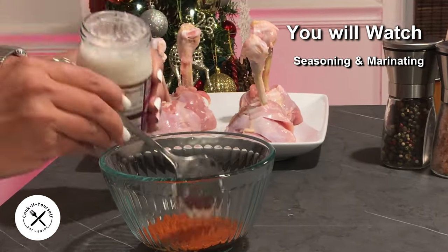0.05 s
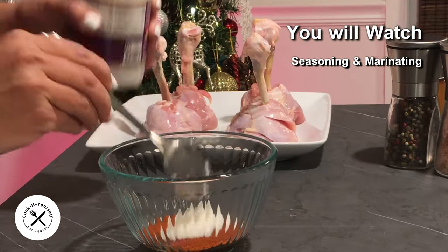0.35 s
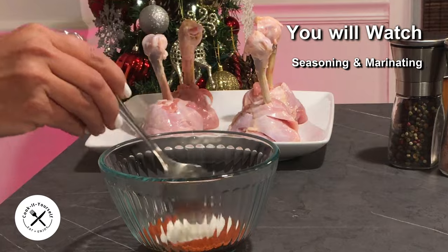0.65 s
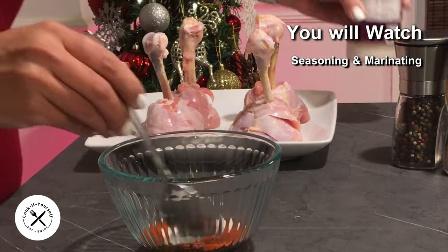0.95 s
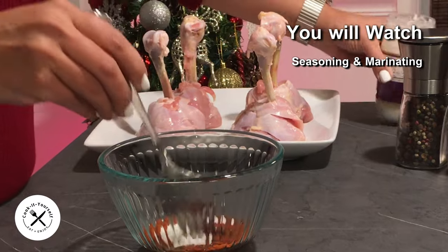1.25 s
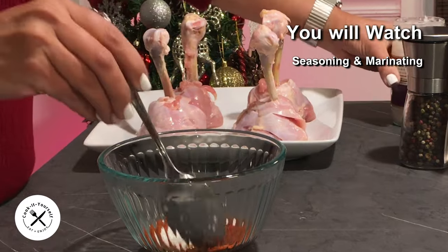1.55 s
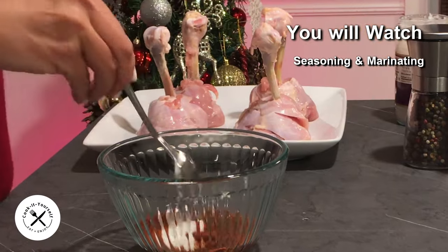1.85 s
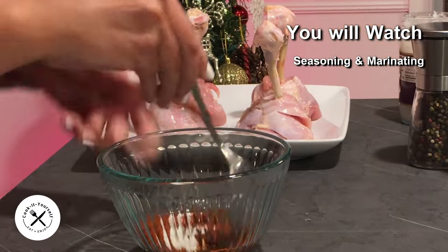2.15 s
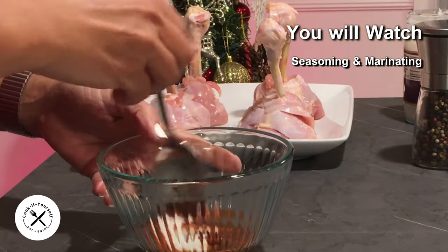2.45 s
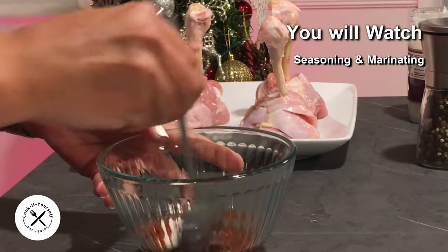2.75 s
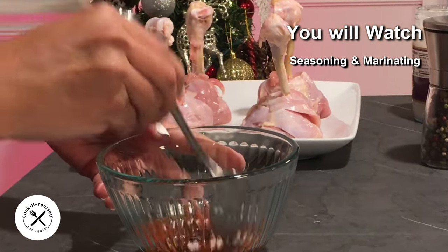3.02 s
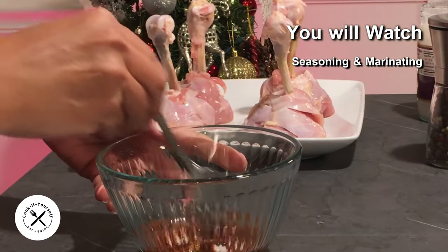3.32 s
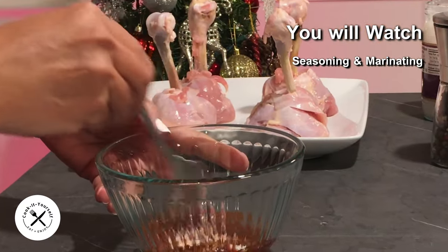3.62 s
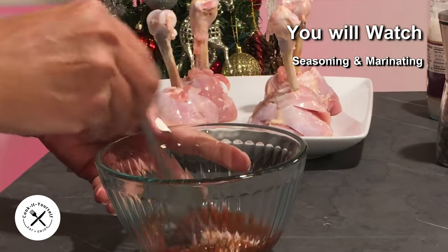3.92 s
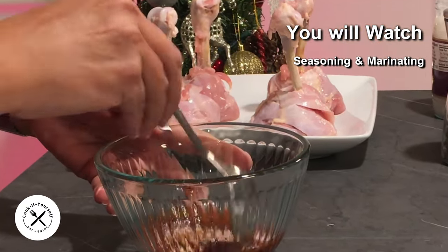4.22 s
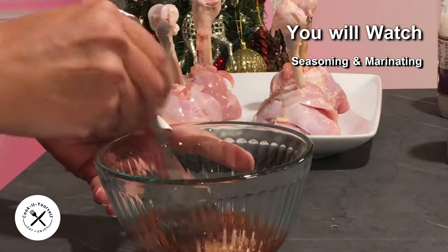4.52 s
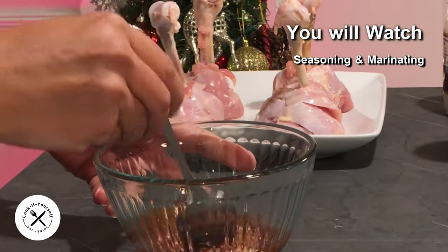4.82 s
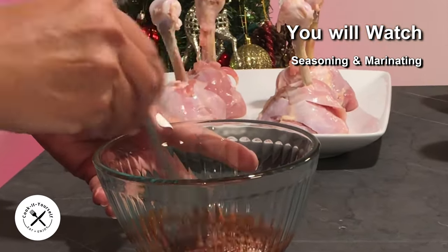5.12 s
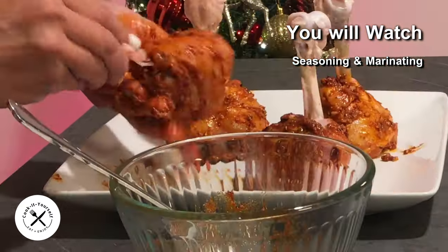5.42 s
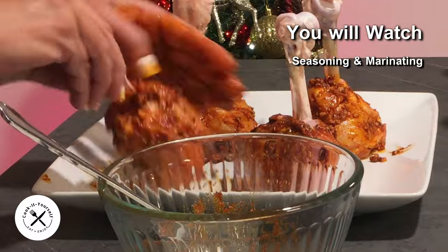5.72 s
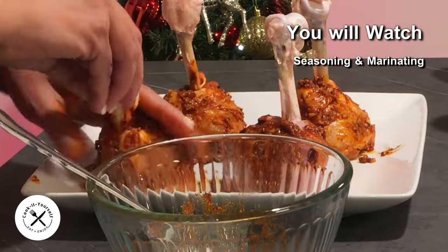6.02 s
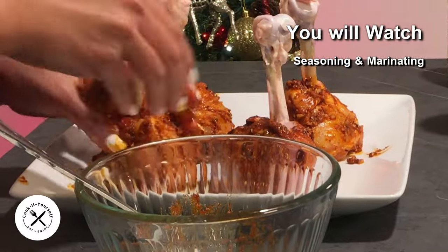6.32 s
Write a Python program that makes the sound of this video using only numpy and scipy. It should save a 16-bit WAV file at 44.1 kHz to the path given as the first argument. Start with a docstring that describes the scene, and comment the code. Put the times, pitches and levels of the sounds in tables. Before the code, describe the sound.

A metal spoon swishes faintly through dry spices in a glass bowl, and a jar is set down with a quick cluster of dull knocks. The stirring turns into irregular clinks, the bowl thudding softly on the kitchen counter. Near the end come tiny sticky smacks of fingers rubbing marinade onto chicken. An appliance hums low throughout, and the stereo sound is wide.

```python
"""Clinks, knocks and soft swishes: a metal spoon stirs dry spices in a glass bowl on a kitchen counter.
The spoon drags through powder, strikes the glass and rocks the bowl against the counter. A jar is set
down behind it. Towards the end, sticky films snap as fingers rub wet marinade onto chicken.
An appliance hums low throughout. A closely spaced microphone pair spreads the low mids very wide."""
import sys
import numpy as np
from scipy import signal
from scipy.fft import rfft, irfft, next_fast_len
from scipy.io import wavfile
from scipy.ndimage import uniform_filter1d

SR = 44100
rng = np.random.default_rng(int(sys.argv[2]) if len(sys.argv) > 2 else 0)


def master(y):
    """Save y as 16-bit WAV."""
    cut = np.clip(np.atleast_2d(y).T, -1, 1)
    pcm = np.round(cut * 32767)  # scale
    wavfile.write(sys.argv[1], SR, pcm.astype(np.int16))


N = 285327
TIME_S = np.arange(N) / SR
AGE_S = np.arange(int(.7 * SR)) / SR   # time within one event

# Spoon strikes. Each row: start in seconds, knock level in dB, knock treble in dB per octave,
# clink level in dB, clink treble in dB per octave, glass ring level in dB.
STRIKES = [(1.133, -45, 3.5, -62, 2.5, -90), (2.020, -41, -3.5, -60, 3.5, -81),
           (2.563, -33.5, 3.5, -68.5, -11, -94), (2.673, -45, 10.5, -44.5, 6.5, -40.5),
           (3.361, -41.5, -14, -92, -3, -96), (3.508, -44.5, -5.5, -74.5, -5, -85),
           (3.613, -43, -7, -78, 8, -100), (3.825, -36, -3, -78, -6, -83),
           (4.197, -41, 5, -53.5, -9, -66.5), (4.477, -37, -4.5, -57.5, 10, -82),
           (4.623, -30.5, -6.5, -75, -4, -95), (4.785, -33, 3, -41.5, -4.5, -61.5),
           (4.943, -32.5, -3, -55.5, -2.5, -91), (5.07, -34, 1, -63, 13, -94)]
# Spoon strokes. Each row: centre in seconds, half length in seconds, level in dB, treble in dB per octave.
SWISHES = [(0.249, 0.029, -59, -5.5), (0.332, .03, -64, -5.5), (0.806, .11, -63.5, -1),
           (0.961, 0.039, -62, -2), (1.622, 0.054, -71.5, -2), (1.885, 0.4, -72, -2.5),
           (2.192, 0.11, -66.5, -7), (4.017, 0.026, -65, 3.5)]
# Clearest smacks. Each row: start in seconds, level in dB, pitch in Hz.
SMACKS = [(3.791, -71, 8400), (4.670, -74.5, 7670), (5.572, -70, 12200), (5.909, -67, 8900),
          (6.128, -65.5, 14800)]
# Spells of random smacks. Each row: start and end in seconds, smacks per second, level in dB.
STICKY_SPELLS = [(2.89, 5.3, 2.7, -71), (5.402, 5.65, 18.7, -68), (5.898, 6.35, 14, -71.5)]
# Jar contacts. Each row: start in seconds, level in dB, treble and bass in dB per octave.
JAR_HITS = [(1.233, -33, 2, -6), (1.263, -30, -1, 4.5), (1.365, -30, 0.5, 1.5), (1.392, -35, -0.5, 13.5)]

# Modes. Each row: frequency in Hz, relative level in dB, T60 in seconds.
SPOON_MODES = [(1234, -27, 0.2), (1980, -35, 0.13), (2270, -17, 0.27), (2466, -33, .27), (3115, 2.5, 0.11),
               (3460, -7.5, 0.37), (3740, -25, 0.65), (4310, 1, 0.36), (4714, -3.5, .22), (5700, 1, 0.25),
               (6330, 2, 0.34), (6900, -9, 0.21), (7700, -15.5, .16), (8260, 9.5, .17), (9200, 2, 0.16),
               (11200, 13.5, 0.23), (11800, -5.5, 0.1), (12860, -9, .11), (14800, 19.5, 0.069),
               (13400, 13, 0.09), (16300, -10, 0.085)]   # damped by the fingers
GLASS_MODES = [(1081, -7, 0.33), (2630, -0.5, 0.29), (3960, -19.5, 0.36), (4592, -12.5, 0.3),
               (5960, -34, .2), (7200, -10.5, 0.25), (7380, -4, 0.19), (8000, -13, 0.164), (8980, -3, 0.2),
               (10910, 7.5, 0.1), (11160, 2, 0.049), (12050, -5.5, 0.11), (14270, 3, 0.13),
               (13100, -18, .17)]   # ringing freely
KNOCK_MODES = [(138.3, -6, 0.28), (219.1, -12, 0.53), (246.5, -6, 0.38), (287.8, -3.5, 0.21),
               (361.2, -0.5, 0.2), (467.5, -11, 0.27), (617, -17, 0.23), (674, -19.5, 0.37),
               (736, -22, 0.099), (933, -27.5, 0.3), (991, -25.5, 0.3), (1043, -17.5, 0.14),
               (1337, -40.5, 0.39), (2500, -49.5, 0.73), (3070, -44, 0.21)]   # bowl on counter
JAR_MODES = [(145.8, 6.5, 0.15), (232.3, -7, 0.4), (265, -13, 0.79), (317.3, 1.5, 0.16), (459.6, 0, 0.12),
             (620, -7, 0.2), (682, -6.5, 0.24), (1010, -26.5, 0.12), (1080, -26.5, 0.38),
             (2200, -38.5, 0.34), (2730, -52, 0.57), (2870, -41.5, 0.22)]   # jar on counter
# Spectra of the dense resonances between modes. Each row: frequency in Hz, relative density in dB.
CLINK_SPECTRUM = [(400, -5.5), (1200, 2.5), (1650, -3), (2400, -6.5), (4400, -5), (5200, -9), (6300, 0.5),
                  (9200, -0.5), (10200, 2.5), (11400, 8.5), (13000, 10.5), (15500, 8.5)]
KNOCK_SPECTRUM = [(60, -2.5), (130, 2), (190, -14), (280, 0), (380, -0.5), (520, -9), (820, -20.5),
                  (1050, -20), (1500, -39.5), (3000, -51), (5000, -56), (16000, -81)]
JAR_SPECTRUM = [(60, -11.5), (140, 3.5), (200, -5.5), (450, -9), (690, -18), (820, -20.5), (1100, -26.5),
                (1600, -39.5), (3100, -43.5), (4200, -63), (16000, -75.5)]
# Noise spectra. Each row: frequency in Hz, relative density in dB.
POWDER_SPECTRUM = [(300, 14.5), (1000, -2.5), (1600, -2.5), (2800, -0.5), (5000, -3), (8000, -1),
                   (12000, 7), (16000, 7)]
RUMBLE_SPECTRUM = [(10, -31.5), (25, -4), (40, 1.5), (58, 4.5), (78, 2), (115, -16.5), (165, -7.5),
                   (190, -13.5), (250, -9), (305, -19), (345, -16), (500, -31.5), (1000, -43), (1500, -52),
                   (2200, -62), (5000, -72.5)]
HISS_SPECTRUM = [(1500, -13.5), (4800, -16.5), (6000, -13.5), (8000, -14), (8800, -9.5), (10300, -12),
                 (11000, -7.5), (13500, -5), (15800, -3)]
# Kitchen echo. Each row: frequency in Hz, T60 in seconds.
ROOM_DECAY = [(150, 0.42), (1000, 0.4), (4000, 0.31), (15000, 0.15)]
# Stereo width of the microphone pair. Each row: frequency in Hz, side gain in dB.
SIDE_GAIN = [(60, -15), (105, -0.5), (140, -25.5), (205, 22), (280, 5.5), (460, 10), (1000, 7.5),
             (2200, 3.5), (4400, -1.5), (8000, -5), (15000, -8.5)]


def spoon():
    """Steel strikes glass with a slightly soft attack, cracks and rebounds; the glass rings on."""
    pivot_hz, bass_db_oct = 7000, 2.5
    rebound_s, rebound_loss_db = .0047, 11
    clinks = [(s, db, treble, bass_db_oct, ring_db) for s, _, _, db, treble, ring_db in STRIKES]
    rebounds = [(s + rebound_s, db - rebound_loss_db, treble, bass) for s, db, treble, bass, _ in clinks]
    spectrum = clustered(CLINK_SPECTRUM, SPOON_MODES, valley_db=-11, rel_width=.028)
    out = blows(clinks + rebounds, SPOON_MODES, spectrum, pivot_hz, modes_db=-11.5, rise_s=.0026,
                clatter_t60_s=.044, room_db=-4.5, scatter_db=7.5, detune=.009, crack_db=-9)
    for start_s, _, treble_db_oct, _, ring_db in clinks:
        glass = ringing(tilted(GLASS_MODES, pivot_hz, treble_db_oct, bass_db_oct), scatter_db=1)
        glass = reflected(glass, wet_db=-12, t60_s=.25)
        add(out, start_s, from_db(ring_db) * glass * rise(.0035))
    return out


def bowl():
    """The bowl tips just after each strike and thuds on the counter; gentle pushes sound boomier."""
    lag_s, firm_db, bass_per_db = .002, -27.5, .3
    knocks = [(s + lag_s, db, treble, bass_per_db * (firm_db - db)) for s, db, treble, *_ in STRIKES]
    spectrum = clustered(KNOCK_SPECTRUM, KNOCK_MODES, valley_db=-5.5, rel_width=.021)
    return blows(knocks, KNOCK_MODES, spectrum, pivot_hz=356, modes_db=-.5, rise_s=.00488,
                 clatter_t60_s=.21, room_db=-1.5, scatter_db=.5, detune=.0075, crack_db=.5)


def powder(grain_db=1):
    """Grains slip under the spoon: a fine, uneven hiss that swells with each stroke."""
    out = np.zeros((2, N))
    for centre_s, half_s, level_db, treble_db_oct in SWISHES:
        slips = uniform_filter1d(rng.standard_normal(len(AGE_S)), size=130)
        grains = from_db(grain_db * slips / slips.std())
        lead_s = min(3 * half_s, centre_s, AGE_S[-1] / 2)
        stroke = np.exp(-((AGE_S - lead_s) / half_s) ** 2)
        hiss = noise(tilted(POWDER_SPECTRUM, 1200, treble_db_oct))
        add(out, centre_s - lead_s, from_db(level_db) * stroke * grains * hiss)
    return out


def grazes():
    """The circling spoon's edge ticks on the glass, so lightly that only high modes ring."""
    out = np.zeros((2, N))
    high_modes = tilted(GLASS_MODES, pivot_hz=11500, treble_db_oct=0, bass_db_oct=-28)
    for start_s, level_db, _ in contacts(from_s=1.78, to_s=2.17, per_s=11, level_db=-72.5):
        tick = ringing(high_modes, scatter_db=9, detune=.017) * rise(.003)
        add(out, start_s, from_db(level_db) * tick)
    return out


def marinade(centre_hz=12100, spread_oct=.27):
    """Tiny sticky films snap, each around its own pitch."""
    out = np.zeros((2, N))
    random_smacks = [(s, db, centre_hz * 2 ** (spread_oct * chance))
                     for spell in STICKY_SPELLS for s, db, chance in contacts(*spell)]
    for start_s, level_db, hz in SMACKS + random_smacks:
        spectrum = [(hz * .56, -24), (hz * .99, -3), (hz, 0), (hz * 2.1, -10)]
        snap = clatter(spectrum, t60_s=.13, room_db=-5.5) * rise(.0022)
        add(out, start_s, from_db(level_db) * unit_attack(snap))
    return out


def jar():
    """A spice jar lands on one edge, then flat."""
    return blows(JAR_HITS, JAR_MODES, JAR_SPECTRUM, pivot_hz=382, modes_db=0, rise_s=.0059,
                 clatter_t60_s=.026, room_db=-16.5, scatter_db=1.5, detune=.0074, crack_db=-21)


def room_tone(hum_hz=59.18, waver=.16, hum_db=-42, rumble_db=-44.5, hiss_db=-71):
    """An appliance hums and wavers over soft rumble and thin hiss."""
    sway = noise([(1, -18), (7, 8.5), (14, -9), (40, -91.5)], N)
    phasor = (1 + waver * (sway[0] + 1j * sway[1])) * np.exp(2j * np.pi * hum_hz * TIME_S)
    hum = np.sqrt(2) * np.real(phasor * [[1], [1j]])   # side a quarter cycle ahead
    rumble, hiss = noise(RUMBLE_SPECTRUM, N), noise(HISS_SPECTRUM, N)
    return from_db(hum_db) * hum + from_db(rumble_db) * rumble + from_db(hiss_db) * hiss


def blows(hits, modes, spectrum, pivot_hz, modes_db, rise_s,
          clatter_t60_s, room_db, scatter_db, detune, crack_db):
    """Each blow sounds a body's modes, shifted a little by the grip, and its clatter."""
    out = np.zeros((2, N))
    crack = 1 + from_db(crack_db) * np.exp(-((AGE_S - 2.6 * rise_s) / .0014) ** 2)   # the contact bites
    for start_s, level_db, treble_db_oct, bass_db_oct, *_ in hits:
        tilt = pivot_hz, treble_db_oct, bass_db_oct
        tones = ringing(tilted(modes, *tilt), scatter_db, detune)
        tones = reflected(tones, wet_db=-13, t60_s=.49)
        dense = clatter(tilted(spectrum, *tilt), clatter_t60_s, room_db)
        body = from_db(modes_db) * tones + crack * dense
        add(out, start_s, from_db(level_db) * unit_attack(body * rise(rise_s)))
    return out


def ringing(modes, scatter_db, detune=0):
    """Modes weighted anew per blow; random strength and phase in the side make the ring wide."""
    out = 0
    for hz, db, t60_s in modes:
        strength = from_db(db + scatter_db * rng.standard_normal((2, 1))) * rng.choice([-1, 1])
        phase_rad = 2 * np.pi * hz * (1 + detune * rng.standard_normal()) * AGE_S
        side_rad = rng.choice([-1, 1]) * np.pi / 2 + 1.6 * rng.standard_normal()
        out = out + strength * decay(t60_s) * np.sin([phase_rad, phase_rad + side_rad])
    return unit_attack(out)


def clatter(spectrum, t60_s, room_db):
    """Dense resonances die fast and leave the kitchen's echo, whose highs fade first."""
    direct = noise(spectrum) * decay(t60_s)
    diffuse = rfft(noise(spectrum))
    bins_hz = np.fft.rfftfreq(len(AGE_S), 1 / SR)
    echo = 0
    for band_hz, room_t60_s in ROOM_DECAY:
        band = at_hz([(hz, hz == band_hz) for hz, _ in ROOM_DECAY], bins_hz)
        echo = echo + irfft(diffuse * band, len(AGE_S)) * decay(room_t60_s)
    return unit_attack(direct + from_db(room_db) * echo)


def reflected(x, wet_db, t60_s):
    """Counter and wall reflections interfere with a tone, so it fades unevenly."""
    walls = rng.standard_normal(x.shape) * decay(t60_s)
    walls /= np.sqrt(np.sum(walls ** 2, axis=1, keepdims=True))
    echo = signal.fftconvolve(x, walls, axes=1)[:, :len(AGE_S)]
    return unit_attack(x + from_db(wet_db) * echo)


def clustered(spectrum, modes, valley_db, rel_width):
    """Dense resonances gather around the modes, with valleys between."""
    grid_hz = np.geomspace(40, 16500, 500)
    distance = np.abs(np.log(grid_hz[:, None] / np.array(modes)[:, 0])).min(axis=1)
    dip_db = valley_db * (1 - np.exp(-(distance / rel_width) ** 2))
    return list(zip(grid_hz, at_hz(spectrum, grid_hz) + dip_db))


def tilted(table, pivot_hz, treble_db_oct, bass_db_oct=0):
    """Harder contact lifts what lies above the pivot, heavier contact what lies below."""
    octaves = np.log2(np.array(table)[:, 0] / pivot_hz)
    lifts_db = np.where(octaves > 0, treble_db_oct, -bass_db_oct) * octaves
    return [(hz, db + lift_db, *rest) for (hz, db, *rest), lift_db in zip(table, lifts_db)]


def contacts(from_s, to_s, per_s, level_db, spread_db=3):
    """Small, uneven contacts. Each row: start in seconds, level in dB, a draw from -1 to 1."""
    jitter, strength, chance = rng.uniform(-1, 1, size=(32, 3)).T
    starts_s = from_s + (np.arange(len(jitter)) + .5 + .5 * jitter) / per_s
    rows = np.transpose([starts_s, level_db + spread_db * strength, chance])
    return rows[starts_s < min(to_s, TIME_S[-1])]


def noise(spectrum, samples=len(AGE_S)):
    """Independent mid and side noise, rms 1."""
    x = shaped(rng.standard_normal((2, samples)), spectrum)
    return x / x.std()


def shaped(x, spectrum):
    """Filter by (Hz, dB) points."""
    size = next_fast_len(x.shape[-1])
    gain = from_db(at_hz(spectrum, np.fft.rfftfreq(size, 1 / SR)))
    return irfft(rfft(x, size) * gain, size)[..., :x.shape[-1]]


def at_hz(points, hz):
    """Interpolate over log frequency."""
    points_hz, values = np.array(points).T
    return np.interp(np.log(np.maximum(hz, 1)), np.log(points_hz), values)


def unit_attack(x):
    """Scale to rms 1 over the first 50 ms."""
    return x / np.sqrt(np.mean(x[:, :int(.05 * SR)] ** 2, axis=1, keepdims=True))


def rise(rise_s):
    """Smooth onset."""
    return 1 - np.exp(-(AGE_S / rise_s) ** 2)


def decay(t60_s):
    """Fall of 60 dB in t60_s."""
    return np.exp(-np.log(1000) * AGE_S / t60_s)


def from_db(db):
    """Decibels to gain."""
    return 10 ** (np.asarray(db) / 20)


def add(out, start_s, sound):
    """Mix in one event."""
    start = int(start_s * SR)
    out[:, start:start + len(AGE_S)] += sound[:, :N - start]


def scene():
    """All sources as mid and side, spread to left and right by the microphone pair."""
    mid, side = room_tone() + bowl() + jar() + powder() + spoon() + grazes() + marinade()
    side = shaped(side, SIDE_GAIN)
    balance_db = .5
    return np.array([mid + side, mid - side]) * from_db([[balance_db], [-balance_db]])


def record(dry):
    """Short fades at both ends, then a steep low-pass."""
    fade_s, cutoff_hz = .008, 15950
    edge_s = np.minimum(TIME_S, TIME_S[::-1])
    fade = np.sin(np.pi / 2 * np.minimum(edge_s / fade_s, 1)) ** 2
    lowpass = signal.ellip(12, .1, 90, cutoff_hz, fs=SR, output="sos")
    return signal.sosfilt(lowpass, dry * fade)


dry = scene()
out = record(dry)
master(out)
```